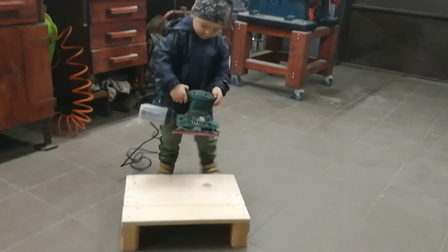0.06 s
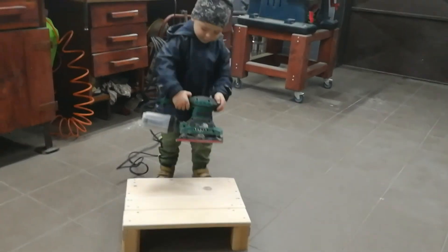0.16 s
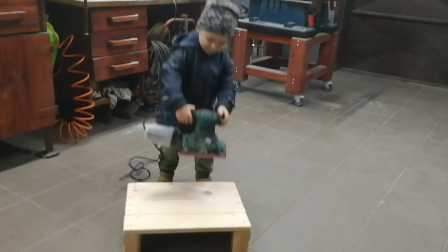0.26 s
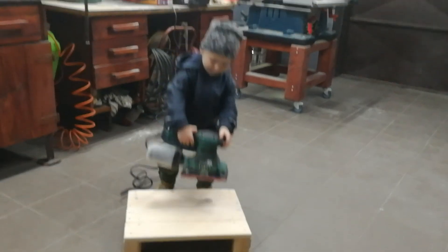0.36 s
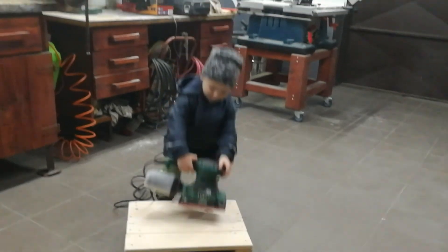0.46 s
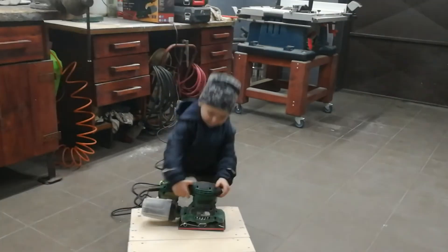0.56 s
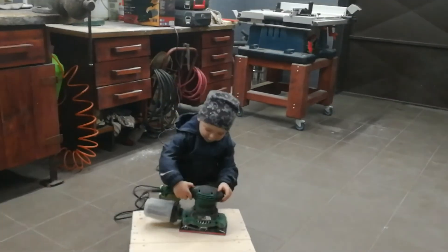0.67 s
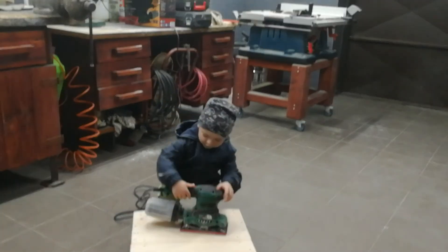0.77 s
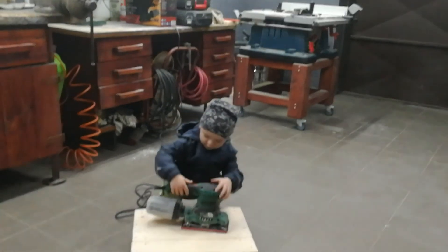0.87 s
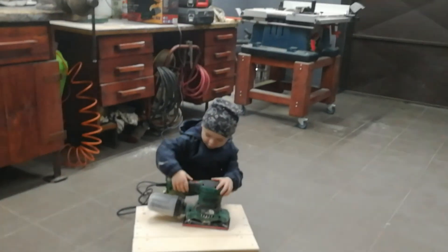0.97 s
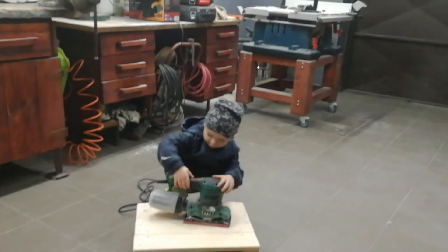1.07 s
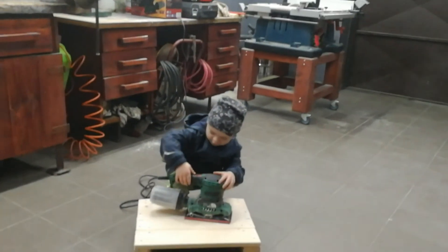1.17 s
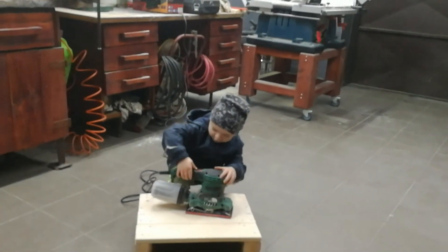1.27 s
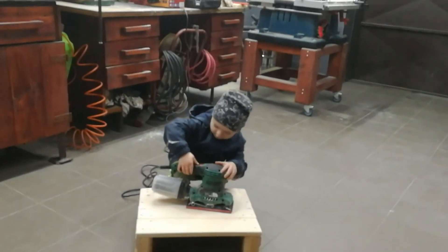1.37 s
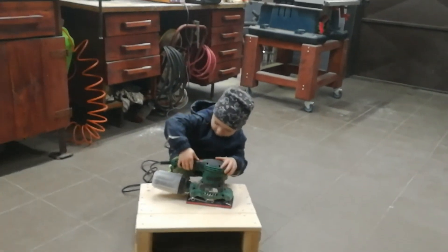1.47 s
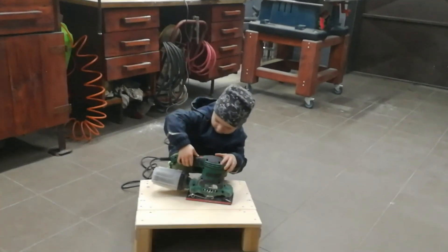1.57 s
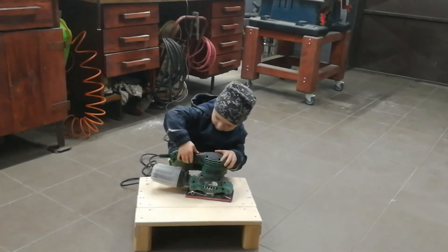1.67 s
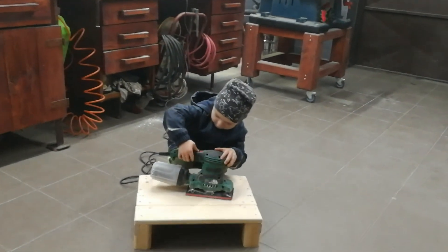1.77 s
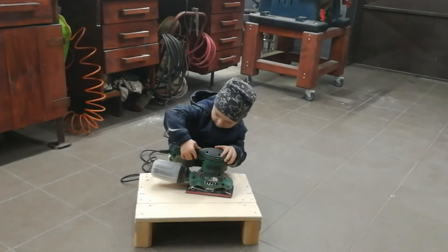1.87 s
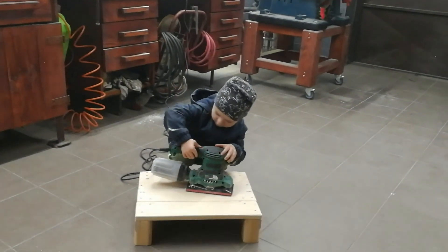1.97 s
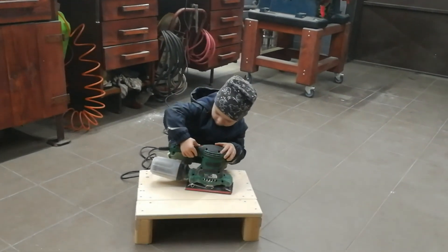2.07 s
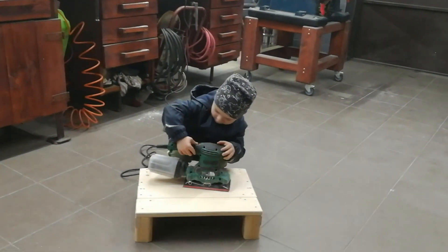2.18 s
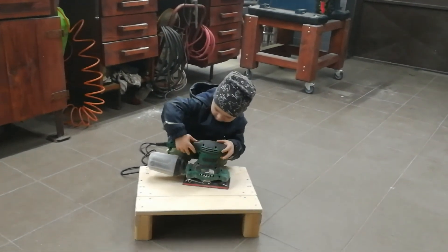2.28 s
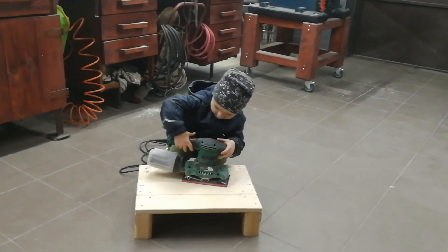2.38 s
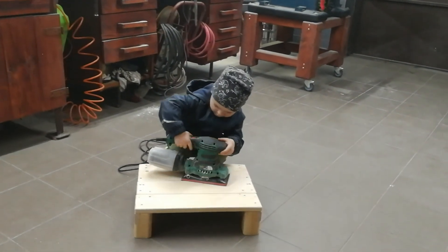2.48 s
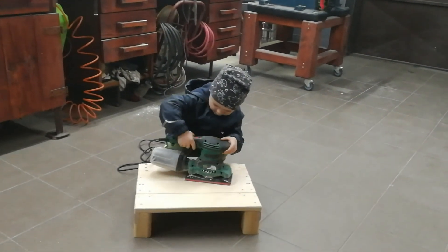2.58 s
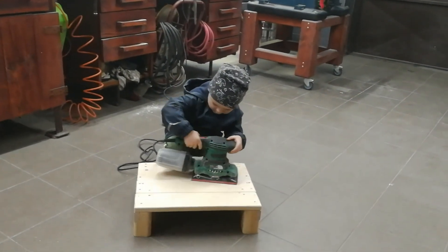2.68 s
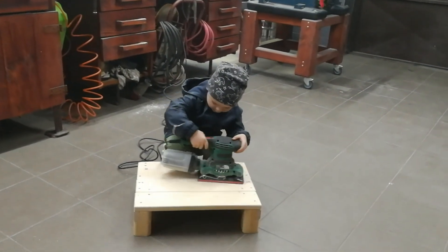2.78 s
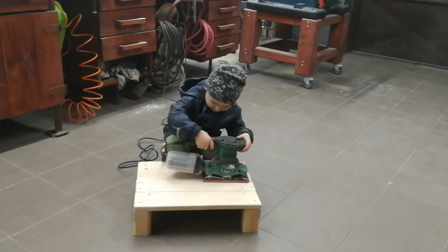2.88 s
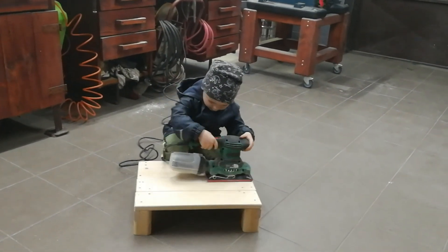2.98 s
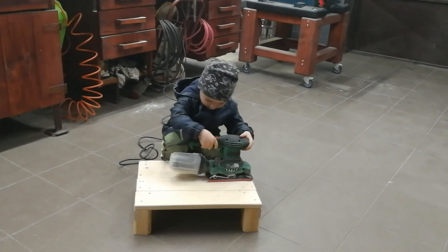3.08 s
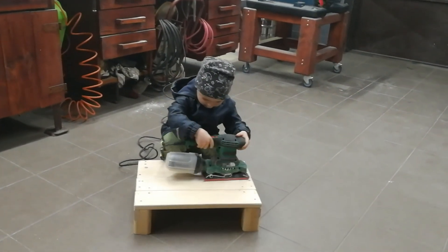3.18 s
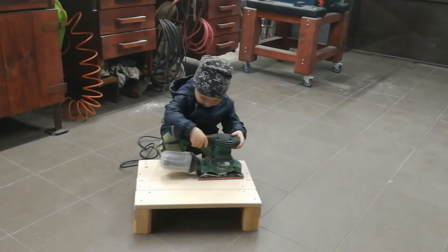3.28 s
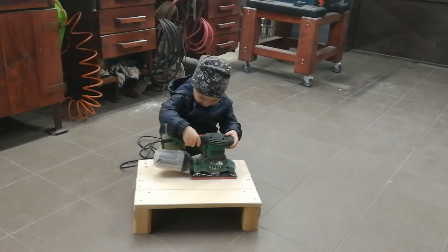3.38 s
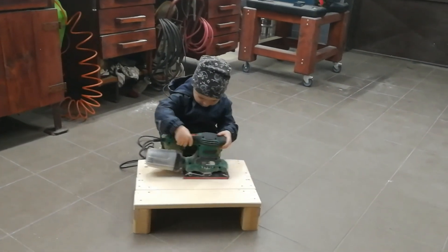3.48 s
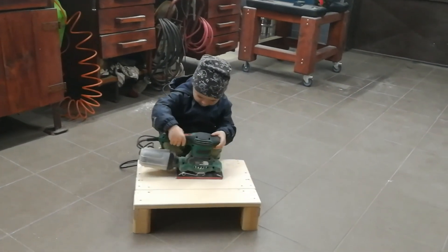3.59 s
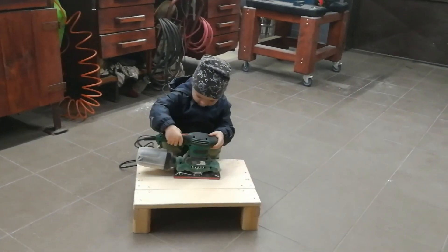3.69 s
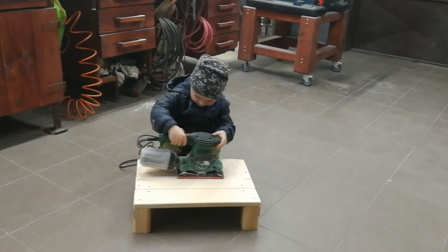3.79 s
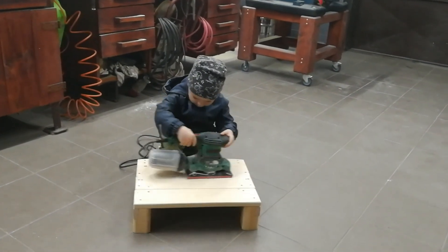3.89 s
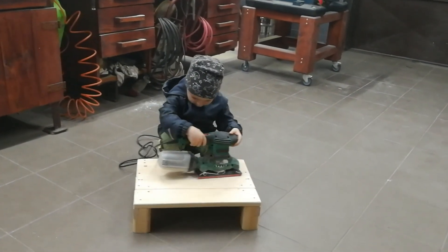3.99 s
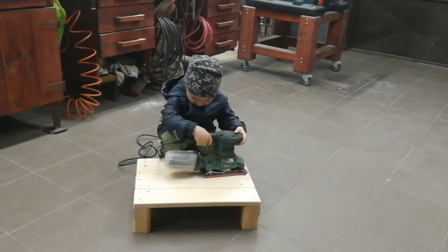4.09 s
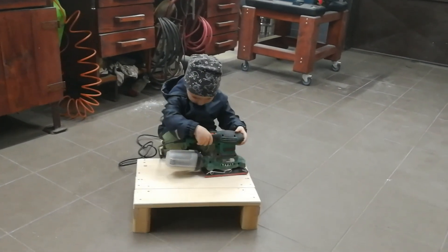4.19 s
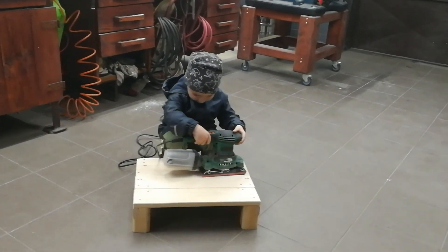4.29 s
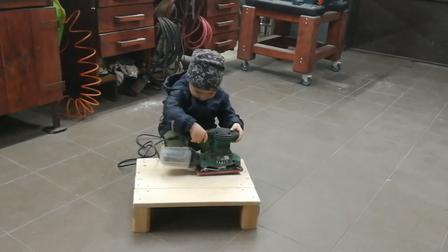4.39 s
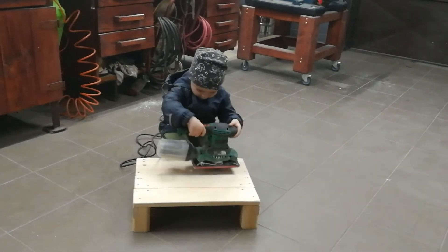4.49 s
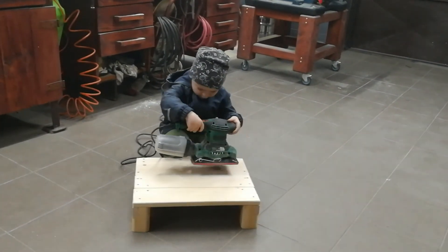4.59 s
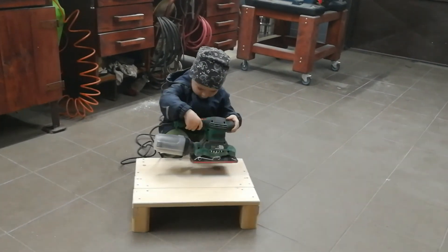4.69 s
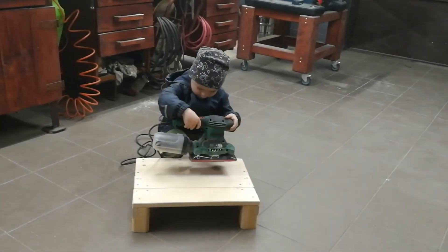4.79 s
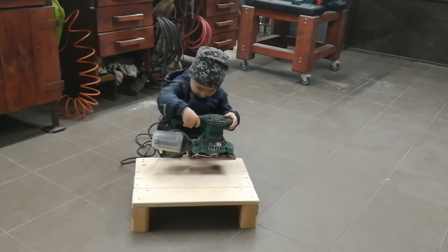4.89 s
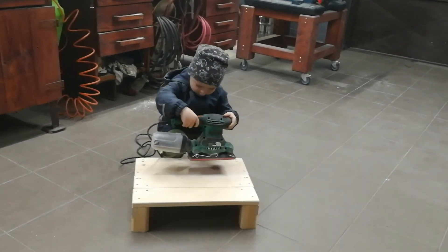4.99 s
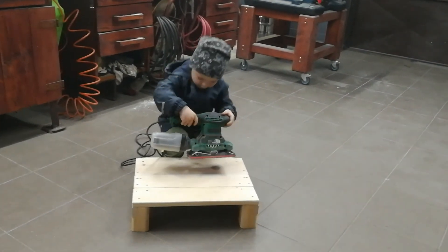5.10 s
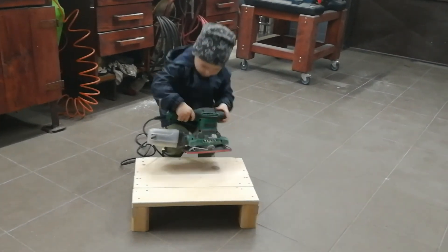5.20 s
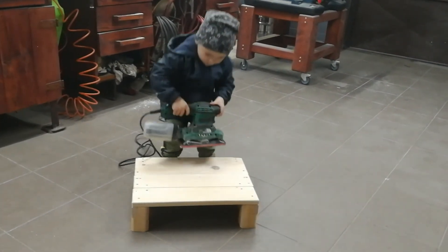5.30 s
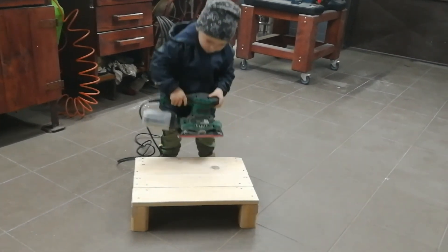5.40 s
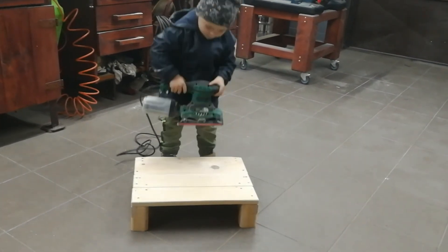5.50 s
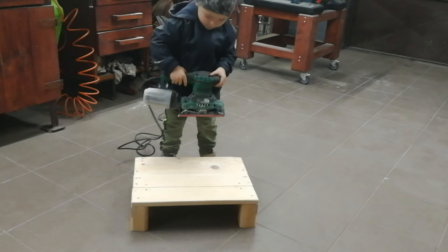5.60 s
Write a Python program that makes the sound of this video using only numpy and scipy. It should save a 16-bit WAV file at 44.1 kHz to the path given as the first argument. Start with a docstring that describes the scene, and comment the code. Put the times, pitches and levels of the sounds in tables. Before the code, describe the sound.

In a workshop, clothing rustles softly and an electric sheet sander is set down on a wooden stool with a hollow plastic clatter. After a pause its switch snaps. The motor starts slowly with dry ticks and a brief judder, then rises to a buzzing hum with sandpaper hiss and rattling. Lifted off the wood, it keeps running with a thin whine and rushing air. The stereo sound carries a short room echo.

```python
"""A sheet sander climbs slowly to speed on a pine stool in a tiled workshop.
One shaft drives it all: the eccentric weight hums at harmonics of the rotation, the pad chatters and
the paper hisses by friction. Beforehand the tool is set down with a clatter that rings the stool's
modes, and its switch snaps in. At the end it is lifted and hums on in the air, with the rush of its
fan and the whine of its commutator."""
import sys
import numpy as np
from scipy import signal
from scipy.fft import rfft, irfft, next_fast_len
from scipy.io import wavfile

SR = 44100
rng = np.random.default_rng(int(sys.argv[2]) if len(sys.argv) > 2 else 0)


def persist_wave(psi):
    """Save psi, clipped to +-1, as 16-bit WAV."""
    counts = np.round(np.clip(psi, -1, 1) * 32767).astype(np.int16)
    wavfile.write(sys.argv[1], SR, np.atleast_2d(counts).T)


N = 248724
TIME = np.arange(N) / SR
FULL_HZ = 138  # full shaft speed


def hum(turns, speed, on_wood, in_air):
    """Forced vibration: the eccentric weight drives shaft harmonics that swell at each resonance."""
    # Each row, from harmonic 1 up: base level on wood and in air in dB, exponent of growth with speed.
    orders = [(-53.5, -46.5, 1.3), (-39, -56, 2.6), (-49, -54.5, 1.3), (-53, -58.5, 0.95), (-50, -58, 3.2),
              (-37, -39.5, 6.8), (-51, -49.5, 4.3), (-50, -53, 2.08)]
    # Resonances of tool, stool and room. Each row: frequency in Hz, half width in Hz, boost in dB.
    resonances = [(196.3, 9, 16.5), (217, 7.8, 7), (266.7, 2.23, 11), (285.64, 4.4, 15), (407.1, 10.5, 12),
                  (462, 9.5, 12), (551.7, 10, 12), (684, 23, 5.5), (828.3, 27, 4.5)]
    # Brief booms due to grip and position. Each row: centre and half length in seconds, harmonic, dB.
    booms = [(2.377, .06, 1, -49.5), (2.672, 0.14, 4, -45.5), (2.74, .13, 1, -47), (3.168, 0.16, 6, -55),
             (3.195, .12, 7, -48.5), (3.334, .08, 2, -32.5), (3.344, .08, 3, -46.5), (3.38, 0.17, 1, -40.5),
             (3.96, .16, 3, -33), (3.978, 0.13, 4, -61), (4.092, 0.2, 2, -31), (4.157, .13, 5, -39.5),
             (4.32, 0.045, 6, -48), (4.446, 0.12, 1, -46.5), (4.82, 0.18, 1, -36), (5.245, 0.1, 1, -41),
             (5.484, 0.16, 4, -42)]
    out, flutter = np.zeros((2, N)), 0.0081 * drift(rate=49)
    for k, (wood_db, air_db, power) in enumerate(orders, 1):
        boost_db = sum(db * np.exp(-((k * speed - hz) / width) ** 2) for hz, width, db in resonances)
        size = held(on_wood) * gain_of(wood_db) + held(in_air) * gain_of(air_db)
        size *= (speed / FULL_HZ) ** power * gain_of(boost_db)
        for s, half, harmonic, db in booms:
            if round(harmonic) == k:
                size += gain_of(db) * np.exp(-abs((TIME - s) / half) ** 3)
        # The left channel leads by a fraction of a cycle that varies as the tool moves.
        lead = min(.05 * k ** 1.6, .17) * (1 + .35 * drift(rate=3))
        phase = k * (turns + flutter) + rng.random() + np.array([lead, -lead]) / 2
        waver = 1 + 0.11 * drift(rate=22)
        out += size * waver * np.sqrt(2) * np.cos(2 * np.pi * phase)
    return out


def bearing_buzz(turns, speed, on_wood, in_air):
    """Play in the bearing adds harmonics 9 to 41, with a common phase jitter."""
    # Spectral envelope. Each row: frequency in Hz, gain in dB.
    spectrum = [(300, -15), (700, 5), (1000, 0), (1600, 1), (2500, -8), (4000, -8), (7000, -6)]
    shaky, stack = turns + .0033 * drift(rate=70), np.zeros(N)
    for k in range(9, 42):
        strength = gain_of(read(spectrum, k * speed[::50])).repeat(50)[:N]
        stack += strength * np.cos(2 * np.pi * (k * shaky + rng.random()))
    pace = speed / FULL_HZ
    return stack * gain_of(-53.5) * (on_wood * gain_of(-0.4 * bite()) * pace ** 3 + in_air * pace ** 8)


def commutator_whine(turns, speed, bars=24):
    """A tone at the bar-passing frequency, amplitude-modulated once a turn."""
    # The whine as the housing passes it. Each row: frequency in Hz, level in dB.
    transmission = [(1300, -63.5), (1900, -51), (2380, -47), (2630, -49.5), (2850, -53), (2980, -46),
                    (3200, -45.5), (3340, -47.5)]
    # The brushes bounce more near full speed.
    bounce = np.interp(speed, [120, 138], [.09, .15]) * drift(rate=130)
    tone = np.cos(2 * np.pi * (bars * turns + bounce))
    wobble = 1 + .7 * np.cos(2 * np.pi * turns)
    return tone * wobble * gain_of(read(transmission, bars * speed))


def paper_hiss(turns, speed, on_wood):
    """Sliding friction of grit on wood, with a fine fizz when the paper first lies flat."""
    # Each row: frequency in Hz, relative spectral density in dB.
    grit = [(300, -22), (1500, -17), (4000, -9.5), (6000, 0.5), (8500, 2.5), (11000, 0), (13500, -0.5),
            (16000, -6)]
    fizz = gain_of(-37) * envelope(2.46, attack=0.13, hold=.12, fall_db_per_s=38)
    fizz = fizz * noise([(6000, -19), (10000, -7), (13500, 3), (16000, -7)])
    rub = on_wood * gain_of(-32.5 + bite()) * (speed / FULL_HZ) ** 0.34 * noise(grit)
    return (rub + fizz) * strokes(turns, depth=0.11, uneven_db=1.0)


def pad_chatter(turns, speed, on_wood, in_air):
    """Repeated impacts: the orbiting pad slaps and rattles, as noise pulsing with the shaft."""
    # Each row: frequency in Hz, relative spectral density in dB.
    slap_spectrum = [(40, -42), (150, -7.5), (500, -10.5), (800, -3.5), (1500, -4), (2100, -13),
                     (3200, -32), (8000, -18)]
    rattle_spectrum = [(500, -56), (1500, -4.5), (2300, -2), (3300, -3.5), (4500, -4), (6000, -6.5),
                       (10000, -17)]
    pace = speed / FULL_HZ
    slap = on_wood * gain_of(-48.5 - 1.64 * bite()) + in_air * gain_of(-45) * pace ** 7
    loose = on_wood * gain_of(-38.5) + in_air * gain_of(-36) * pace ** 3.2
    chatter = slap * noise(slap_spectrum) * strokes(turns, depth=0.15, uneven_db=3.0)
    rattle = loose * noise(rattle_spectrum) * strokes(turns, depth=0.033, uneven_db=1.5)
    return chatter + rattle


def stool_thrum(turns):
    """Structure-borne sound: the first torque nudges the stool, then the freed pad shakes it."""
    # Each row: frequency in Hz, relative spectral density in dB.
    spectrum = [(30, -34), (80, -34), (150, -28), (205, 4), (270, -9), (350, -4.5), (500, -14),
                (1000, -28.5)]
    nudge = gain_of(-55) * envelope(1.89, attack=.025, hold=.03, fall_db_per_s=30)
    shake = gain_of(-35) * envelope(2.03, attack=.05, hold=.27, fall_db_per_s=28) * (1 - ramp(2.65, .2))
    return (nudge + shake) * noise(spectrum) * strokes(turns, depth=0.084, uneven_db=-0.5)


def skid(turns):
    """Friction grabs the accelerating pad, which judders briefly across the board."""
    rasp = noise([(150, -19), (400, 1), (850, 0), (1500, 2), (2100, -6), (3200, -19)])
    grab = envelope(2.348, attack=.017, hold=.09, fall_db_per_s=80)
    return gain_of(-33) * grab * rasp * strokes(turns, depth=0.15, uneven_db=0)


def jangle(turns):
    """Impulse-driven resonators: off the wood, loose parts are kicked once an orbit and ring."""
    # Each row: resonance and bandwidth in Hz, start and end in seconds, relative level in dB.
    parts = [(1600, 430, 4.33, 4.52, -41), (1940, 530, 4.33, 4.48, -39.5), (2494, 270, 5.08, 5.35, -40),
             (2248, 240, 5.28, 5.64, -41)]
    out, kicks = np.zeros(N), unit_rms(np.diff(np.floor(turns), prepend=0))
    for hz, width, start, end, db in parts:
        b, a = signal.iirpeak(hz, hz / width, SR)
        shaken = kicks * (1 + 0.23 * drift(rate=150)) + 1.6 * rng.standard_normal(N)
        ringing = signal.lfilter(b, a, signal.lfilter(b, a, shaken))
        out += unit_rms(ringing) * level([(start, db), (end, db)])
    return gain_of(-6) * room(out, wet_db=0.5)


def fan(turns, speed):
    """Flow noise of the cooling air grows as a power of the shaft speed."""
    # Each row: frequency in Hz, relative spectral density in dB.
    spectrum = [(30, -25), (200, -5.5), (600, 0), (3000, -1), (5500, -16.5), (7700, 1), (9000, -1.5),
                (10800, -17.5), (12500, -10.5), (16000, -12.5)]
    rush = gain_of(-39) * (speed / FULL_HZ) ** 1.6 * noise(spectrum)
    return rush * strokes(turns, depth=0.13, uneven_db=-0.5)


def knocks():
    """Impacts excite damped modes as the pad lands: wood booms, plastic clacks, grit cracks."""
    # Each row: start in seconds, relative levels of wood, plastic and crack in dB.
    impacts = [(.192, -51.5, -73.5, -51), (0.4408, -31.5, -41, -34.5), (0.4646, -29.5, -23, -38.5),
               (.489, -39, -33, -55.5), (.504, -37.5, -35, -55.5), (0.53, -65, -48, -26),
               (.537, -25.5, -39, -29), (.549, -22, -38, -48.5), (0.558, -5.5, -26.5, -39),
               (.562, -12, -31.5, -41), (.569, -13, -34, -48), (.648, -20.5, -45, -60),
               (0.715, -34, -42, -56.5), (.785, -44.5, -61.5, -60)]
    # The weight settles onto the stool's legs. Each row: start in seconds, level in dB.
    settles = [(0.538, -30.5), (0.557, -36.5), (0.604, -37.5), (0.771, -46)]
    # Each row: frequency in Hz, relative level in dB, 60 dB decay time in seconds.
    stool_modes = [(186.4, -27, 0.74), (232, -27, 0.35), (342.6, -18.5, 0.35), (650, -17.5, 0.038),
                   (893.6, -6.5, 0.097), (1190, -13, 0.19), (1297, -12.5, 0.1), (1513, -6, 0.089),
                   (1637, -14.5, .1), (2146, -13, 0.066)]
    sole_modes = [(2133, -14, .12), (2270, -18, .08)]
    # Contact noises. Each row: frequency in Hz, relative spectral density in dB.
    clack = [(30, -41), (70, -25), (180, -9), (380, -9), (560, -12.5), (870, -0.5), (1500, 1), (2100, -4),
             (2800, -19.5), (5000, -32), (12000, -56.5)]
    plastic = [(400, -17), (1100, -5.5), (1600, -4), (2100, 6), (2700, -7.5), (3700, -11), (5000, -26.5),
               (10000, -36)]
    crack = [(200, -32.5), (700, -11.5), (2500, 0), (5000, -0.5), (8000, 0), (12000, 0.5), (16000, -1.5)]
    thud = [(25, -32.5), (65, -12), (120, -21.5), (180, 5.5), (260, -2.5), (350, 0), (520, -13),
            (1200, -42.5)]
    out, wood, sole = np.zeros((2, N)), ring(stool_modes), ring(sole_modes)
    for s, wood_db, plastic_db, crack_db in impacts:
        add(out, s, gain_of(wood_db - 7) * (gain_of(-3.5) * wood + burst(clack, decay=0.0075)))
        add(out, s, gain_of(plastic_db - 5.5) * (sole + burst(plastic, decay=.006)))
        add(out, s, gain_of(crack_db - 11) * burst(crack, decay=.007))
    for s, db in settles:
        add(out, s, gain_of(db) * burst(thud, decay=0.012))
    return room(out, wet_db=0.5)


def switch():
    """The trigger slides with faint friction, then its impact excites the plastic housing."""
    # Each row: start in seconds, relative level in dB.
    snaps = [(1.8751, -17), (1.877, -13), (1.881, -12)]
    # Each row: frequency in Hz, relative spectral density in dB.
    housing = [(300, -26), (520, -40), (690, 1), (900, -10), (1150, -3), (1500, 6), (1900, -5), (2300, 5.5),
               (2900, -4), (3600, -3), (6000, -6.5), (9000, -4.5), (12500, -4.5), (16000, -11)]
    out = np.zeros((2, N))
    for s, db in snaps:
        add(out, s, gain_of(db - 6) * burst(housing, decay=0.0031))
    scrape = noise([(1000, -49.5), (1800, -5), (2100, 7), (2400, -18), (3500, -37)])
    scrape *= level([(1.58, -75), (1.63, -66), (1.72, -72), (1.86, -68)])
    return room(out, wet_db=-0.5) + scrape


def jerks():
    """Stick-slip: in its first turns the pad breaks loose in dry ticks that ring the stool's top."""
    # Each row: start in seconds, relative level in dB.
    slips = [(2.005, -31), (2.0428, -23), (2.0723, -19), (2.0982, -17), (2.11, -23), (2.122, -19),
             (2.13, -25), (2.146, -27), (2.2367, -29), (2.38, -22)]
    # Each row: frequency in Hz, relative spectral density in dB.
    tick = [(100, -33), (210, -14), (450, -15), (900, -12), (1450, 8), (2100, 2.5), (3000, -19),
            (6000, -11), (14000, -35)]
    out, top = np.zeros((2, N)), ring([(201.5, -15.5, 0.56), (257, -26, 0.37)])
    for s, db in slips:
        add(out, s, gain_of(db - 2.5) * (top + burst(tick, decay=0.0017)))
    return room(out, wet_db=-1.5)


def background():
    """Diffuse room noise, friction of sleeves and cable, and one soft low bump."""
    # Each row: start and hold in seconds, level in dB.
    rustles = [(-.02, .02, -58.5), (0.224, 0.056, -58), (0.363, .06, -63.5), (.66, 0.059, -56),
               (0.847, .25, -74.5)]
    # Each row: frequency in Hz, relative spectral density in dB.
    cloth = [(100, -7), (400, -5.5), (900, 2), (2500, -5), (5000, -1.5), (8000, -3.5), (11000, -7.5),
             (16000, -10)]
    room_tone = [(20, -2), (60, 0), (110, -3), (190, 5), (280, 3.5), (410, -3), (540, -8), (850, -5.5),
                 (1500, -5.5), (2500, -6.5), (5000, -11.5), (8500, -17), (11000, -14), (16000, -17)]
    bump = noise([(25, -20), (50, -16.5), (70, -3), (120, -12), (250, -25), (800, -43)])
    bump *= level([(1.3, -66), (1.38, -60), (1.5, -70)])
    rustle = sum(gain_of(db) * envelope(s, .022, hold, fall_db_per_s=128.5) for s, hold, db in rustles)
    return gain_of(-66) * noise(room_tone) + rustle * noise(cloth) + bump


def room(x, wet_db):
    """Reverberation: the direct sound plus a tail in which each band decays at its own rate."""
    # Each row: frequency in Hz, reverberation time in seconds.
    workshop = [(100, 0.52), (400, 0.62), (1500, 0.43), (4000, 0.52), (8000, 0.35), (15000, 0.27)]
    hz, t, bands = signal.stft(paired(rng.standard_normal((2, SR))), SR, nperseg=256)
    tail = signal.istft(bands * gain_of(-60 * t / read(workshop, hz)[:, None]), SR, nperseg=256)[1]
    tail *= np.clip(TIME[:tail.shape[1]] / 0.0065, 0, 1)
    wet = signal.oaconvolve(np.atleast_2d(x), tail / np.linalg.norm(tail[0]), axes=1)[:, :N]
    return x + gain_of(wet_db) * wet


def held(control, lag_s=.04):
    """A first-order lag stands for the build-up and decay of a tone in the room."""
    keep = np.exp(-1 / (lag_s * SR))
    return signal.lfilter([1 - keep], [1, -keep], control)


def bite():
    """Contact in dB: the flatter the paper lies, the more it hisses and the less it chatters."""
    # Each row: time in seconds, gain of the hiss in dB.
    flatness = [(2.1, -6.5), (2.48, -6.5), (2.66, 1), (2.96, 0), (3.1, -3), (3.42, -2), (3.52, 1),
                (3.86, .5), (4.28, -3.5)]
    return np.interp(TIME, *np.transpose(flatness))


def strokes(turns, depth, uneven_db):
    """Amplitude modulation by two unequal pushes an orbit, their sizes scattered by uneven_db."""
    size = gain_of(uneven_db * rng.standard_normal(N // 20))[(2 * turns).astype(int)]
    pushes = np.cos(4 * np.pi * turns) + 0.46 * np.cos(2 * np.pi * turns)
    return unit_rms(size * np.exp(depth * pushes))


def ring(modes):
    """Free decay of modes. Each row: frequency in Hz, level in dB, 60 dB decay time in seconds."""
    t = TIME[:SR // 2]
    return sum(gain_of(db - 60 * t / t60) * np.sin(2 * np.pi * (hz * t + rng.random()))
               for hz, db, t60 in modes)


def burst(spectrum, decay):
    """Contact noise dying exponentially, with time constant decay in seconds."""
    t = TIME[:SR // 7]
    return np.pad(noise(spectrum, len(t)) * np.exp(-t / decay), [(0, 0), (0, SR // 2 - len(t))])


def noise(spectrum, length=N):
    """Diffuse stereo noise of rms 1. Each row: frequency in Hz, relative density in dB."""
    return unit_rms(colour(paired(rng.standard_normal((2, length))), spectrum))


def paired(x):
    """Partial coherence: two independent signals become alike in the bass, apart in the treble."""
    # Each row: frequency in Hz, left-right correlation.
    coherence = [(100, 0.92), (250, 1), (500, 0), (1200, 0.58), (2500, 0), (6000, 0)]
    size = next_fast_len(x.shape[1])
    a, b = rfft(x, size)
    same = np.clip(read(coherence, np.fft.rfftfreq(size, 1 / SR)), -1, 1)
    return irfft(np.array([a, same * a + np.sqrt(1 - same ** 2) * b]), size)[:, :x.shape[1]]


def colour(x, spectrum, size=4096):
    """Minimum-phase filter: the phase is the Hilbert transform of the log gain."""
    log_gain = np.log(gain_of(read(spectrum, abs(np.fft.fftfreq(size, 1 / SR)))))
    taps = np.fft.ifft(np.exp(np.conj(signal.hilbert(log_gain)))).real[:size // 2]
    return signal.oaconvolve(x, taps.reshape((1,) * (x.ndim - 1) + (-1,)), axes=-1)[..., :x.shape[-1]]


def drift(rate):
    """Random wander of rms 1 through rate values a second."""
    knots = rng.standard_normal(N // 20)
    return unit_rms(np.interp(TIME * rate, np.arange(len(knots)), knots))


def level(rows):
    """A gain curve fading quickly outside its span. Each row: time in seconds, level in dB."""
    s, db = np.transpose(rows)
    outside = np.maximum(s[0] - TIME, 0) + np.maximum(TIME - s[-1], 0)
    return gain_of(np.interp(TIME, s, db)) * np.exp(-(outside / 0.026) ** 2)


def envelope(start, attack, hold, fall_db_per_s):
    """Linear attack, hold and exponential decay."""
    return ramp(start, attack) * gain_of(-fall_db_per_s * np.maximum(TIME - start - attack - hold, 0))


def ramp(start, length):
    """Linear rise from 0 to 1, timed in seconds."""
    return np.clip((TIME - start) / length, 0, 1)


def read(points, hz):
    """Interpolation on a log-frequency axis."""
    f, value = np.transpose(points)
    return np.interp(np.log(hz + 1), np.log(f + 1), value)


def add(mix, s, sound):
    """Superposes a sound at s seconds."""
    part = mix[..., round(s * SR):][..., :sound.shape[-1]]
    part += sound[..., :part.shape[-1]]


def gain_of(db):
    """Decibels to amplitude."""
    return 10 ** (np.asarray(db) / 20)


def unit_rms(x):
    """Scales to rms 1."""
    return x / np.sqrt(np.mean(x ** 2) + 1e-20)


def scene():
    """The sources superpose; those of the running tool follow one shaft, on wood and then in air."""
    # The motor's climb. Each row: time in seconds, shaft speed in Hz.
    climb = [(2.3, 56.2), (2.38, 65.15), (2.5, 74.56), (2.57, 83.3), (2.62, 88.64), (2.89, 102.4),
             (2.93, 103.7), (3.12, 109.4), (3.4, 114.5), (3.85, 120.1), (4.19, 120.4), (4.42, 123.9),
             (4.6, 129.4), (4.88, 134.2), (5.08, 134.8), (5.19, 136.7), (5.61, 138.1), (5.64, 138.3)]
    start_s, loose_s, lift_s = 1.96, 1.928, 4.3  # shaft starts, pad loosens, tool leaves the wood
    speed = np.interp(TIME, *np.transpose(climb)) * np.sqrt(ramp(start_s, climb[0][0] - start_s))
    turns = np.cumsum(speed) / SR
    in_air = ramp(lift_s, 0.02)
    on_wood = ramp(loose_s, 0.27) * (1 - in_air)
    motion = turns, speed, on_wood, in_air
    running = hum(*motion)
    upper_tones = bearing_buzz(*motion) + (on_wood + in_air) * commutator_whine(turns, speed)
    running += room(upper_tones, wet_db=3.0)
    running += paper_hiss(turns, speed, on_wood) + pad_chatter(*motion) + stool_thrum(turns)
    running += skid(turns) + jangle(turns) + fan(turns, speed)
    return running + knocks() + switch() + jerks() + background()


def record(dry):
    """Each microphone port resonates in its own way; a low-pass filter then limits the band."""
    # Each row: frequency in Hz, gain in dB.
    left_port = [(300, -2.5), (800, 1), (1300, -2.5), (2200, -2.5), (3000, 1), (6000, 1), (7300, 4.5),
                 (8500, 12.5), (9300, 7), (10000, 0.5), (12000, -7), (16000, -15)]
    right_port = [(300, -3), (800, -1), (1300, 0), (2200, 1.5), (3000, 0.5), (6000, 1), (7500, 1.5),
                  (8500, -2.5), (9500, -6.5), (10800, -6.5), (12300, -0.5), (14000, -1.5), (16000, -5)]
    heard = np.array([colour(dry[0], left_port), colour(dry[1], right_port)])
    low_pass = signal.firwin(511, cutoff=15900, window=("kaiser", 9), fs=SR)
    return signal.oaconvolve(heard, low_pass[None], "same")


dry = scene()
out = record(dry)
persist_wave(out)
```